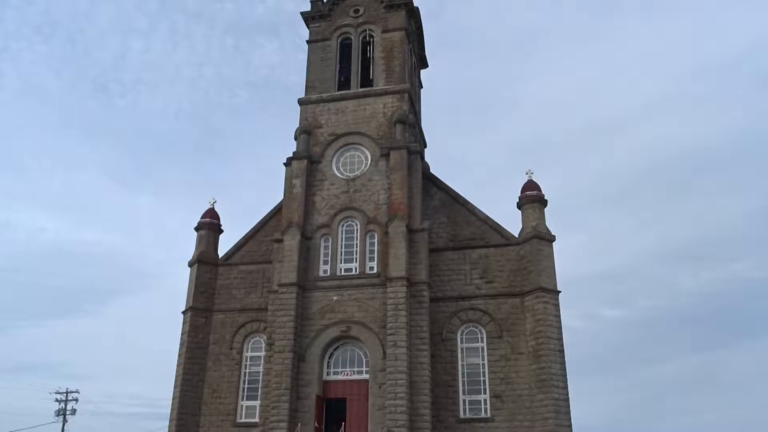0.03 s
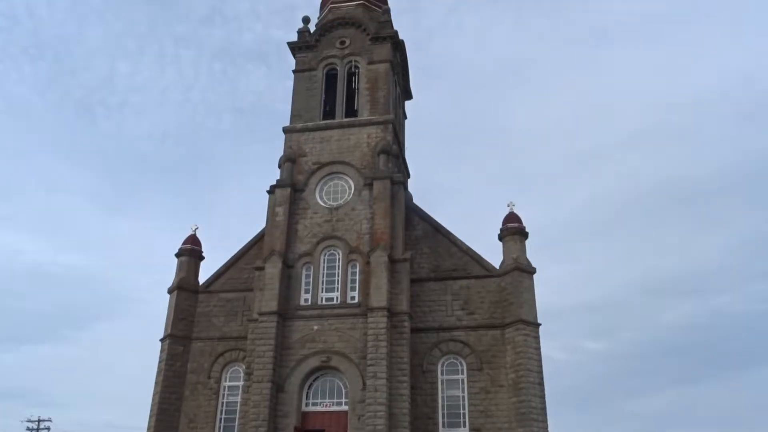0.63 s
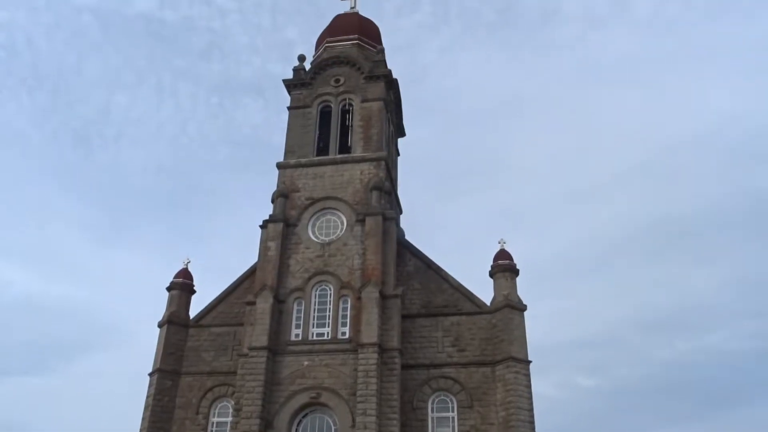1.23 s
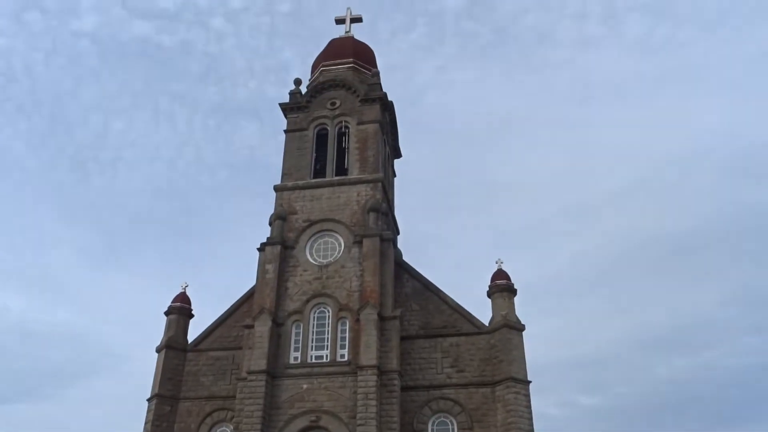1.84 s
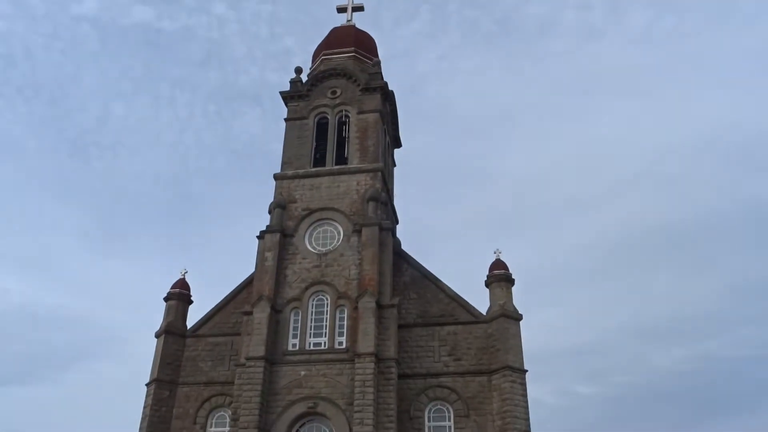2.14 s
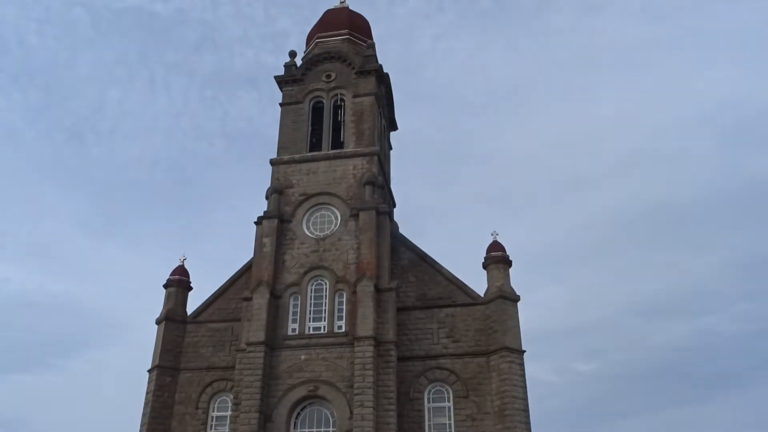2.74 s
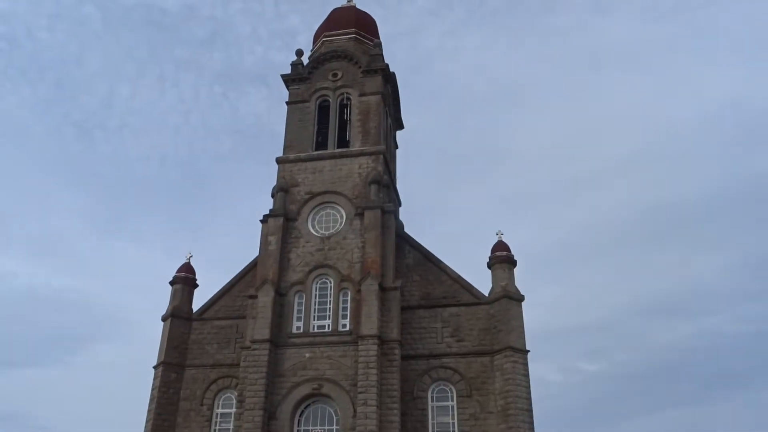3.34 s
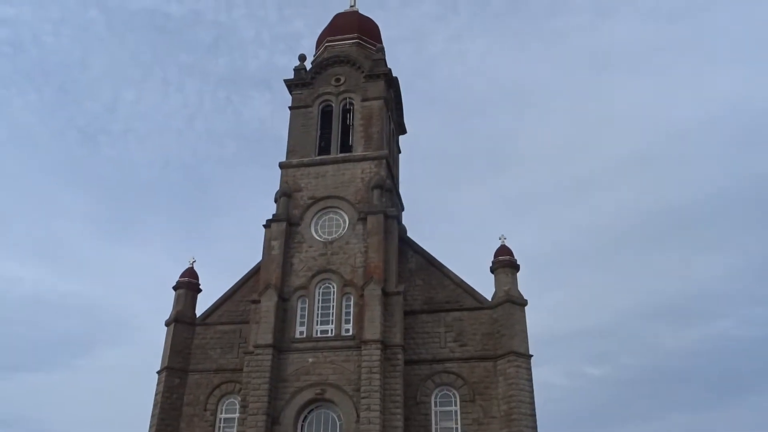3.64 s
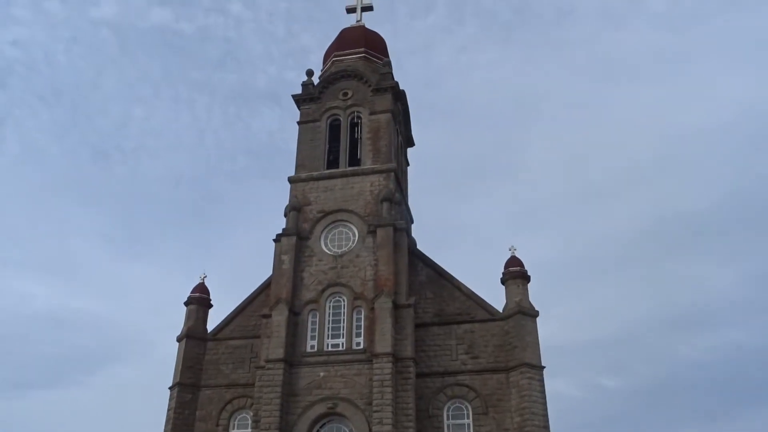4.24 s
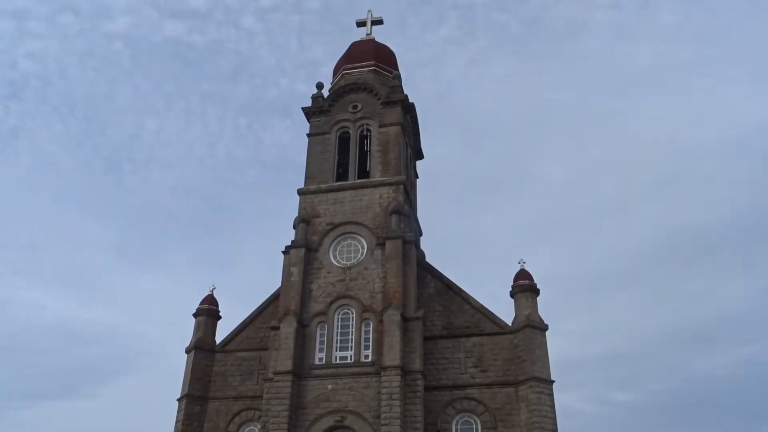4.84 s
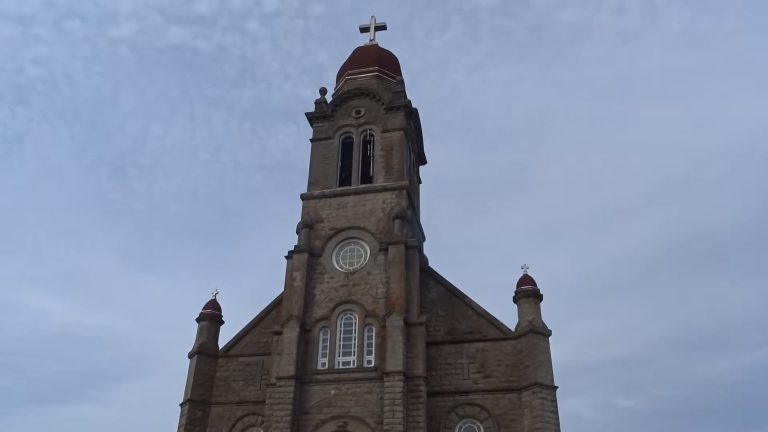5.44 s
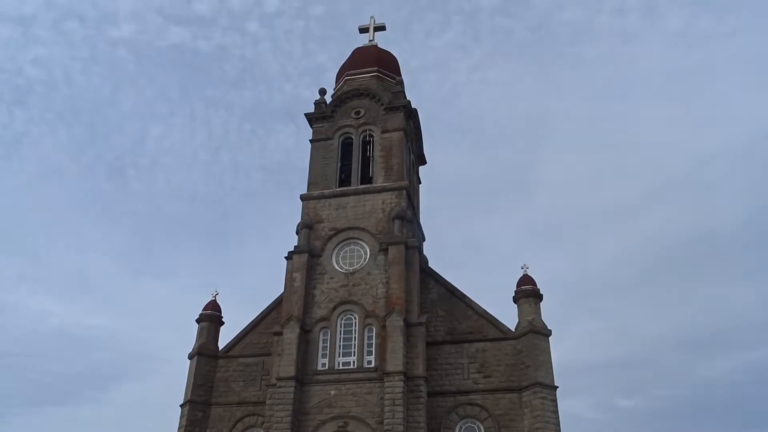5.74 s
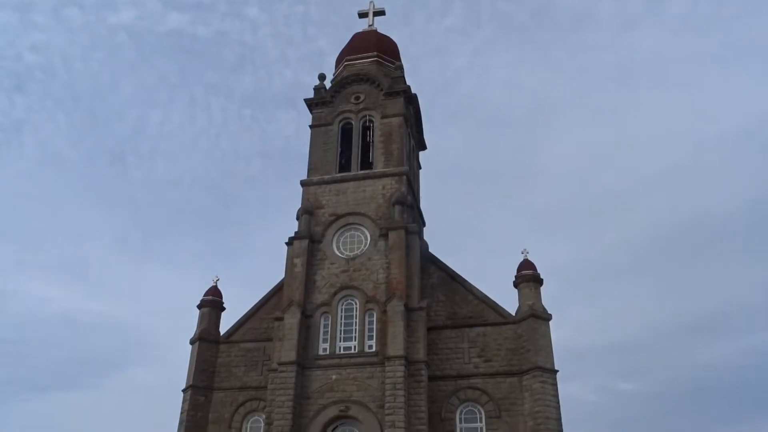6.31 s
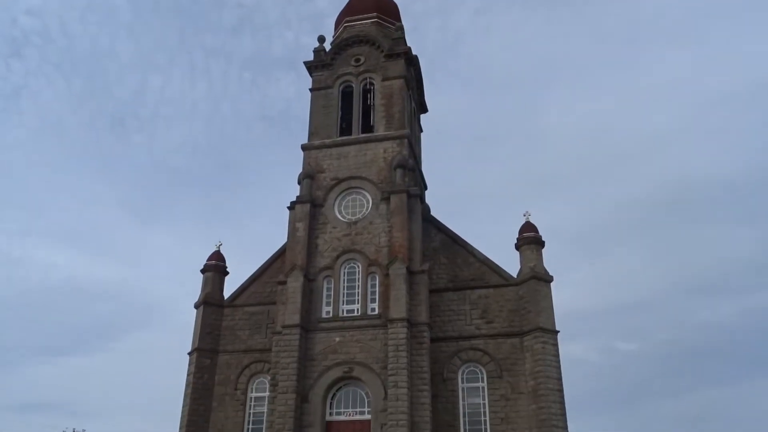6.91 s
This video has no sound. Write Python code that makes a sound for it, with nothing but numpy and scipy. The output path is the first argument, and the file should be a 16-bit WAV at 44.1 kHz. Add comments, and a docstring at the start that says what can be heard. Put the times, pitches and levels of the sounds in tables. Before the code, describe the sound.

A large church bell tolls five slow, ringing strokes outdoors while gusts of wind rumble on the microphone.

```python
"""In front of a stone church tower, a large bell swings and its clapper strikes five times, on alternate
sides. Each blow excites the bell's normal modes, which decay exponentially. With every full swing the same
lobes and gaps of the principal partials sweep past the listener; the belfry walls throw the sound back.
Turbulent wind buffets the microphone of a hand-held camera, which ticks in the hand. Small birds call
faintly over a distant rush and quiet open air."""
import sys
import numpy as np
from scipy import signal
from scipy.fft import rfft, irfft, next_fast_len
from scipy.io import wavfile
from scipy.ndimage import map_coordinates

SR = 44100
rng = np.random.default_rng(int(sys.argv[2]) if len(sys.argv) > 2 else 0)


def transcribe(u):
    """Save the signal u as a 16-bit wav file named by the first command-line argument.

    u: samples, shape (n,) or (channels, n), limited to [-1, 1]; the rate is SR.
    q: integer samples, one column per channel.
    """
    v = np.clip(np.atleast_2d(u).T, -1, 1)
    q = np.round(v * 32767).astype(np.int16)
    wavfile.write(sys.argv[1], SR, q)


N = 307377
TIME = np.arange(N) / SR
STEP = 64  # audio samples per envelope sample
SLOW = np.arange(next_fast_len(N // STEP + 300)) * STEP / SR  # envelope time [s]


def bell(flicker_db=1.08):
    """Modal superposition: the modes add, and the whole ring flickers slightly and quickly in level."""
    modes = principal_partials() + weak_partials() + shimmer()
    return tones(modes) * amp(flicker_db * wobble(22, TIME))


# Clapper blows: (time [s], level [dB], side struck [signed weight], treble tilt [dB/octave],
# clang burst boost [dB], hum boost [dB], prime boost [dB], octave boost [dB], upper fourth boost [dB])
BLOWS = [(0.029, 1.5, 0.7, -3.5, -1.5, 2.5, 4, -0.5, 3), (1.386, 2.5, -0.49, -1.5, 0, 7.5, -2, -5, 2.5),
         (2.881, 1.5, 0.79, -1.1, 0, -2, -1, 2.5, 0.5), (4.283, -1, -1.1, 1, 4, 0, 1.5, 6, 3),
         (5.752, 0, 1, 0.5, -5, 3, 0, 3.5, -3.5)]

def ringing(hz, db, t60, side_db, extra_db=0, deaden_db=0, attack_s=0.012):
    """Damped resonance: the blows' energies add in a mode; each cuts the older ring by deaden_db."""
    onset, level, side, tilt, *_ = np.transpose(BLOWS)[:, :, None]
    age = np.maximum(SLOW - onset, 0)
    later_blows = np.sum(age > 0, axis=0) - np.cumsum(age > 0, axis=0)
    blow_db = db + level + extra_db + side * side_db + tilt * max(np.log2(hz / 3000), 0)
    # the ring swells as the mouth faces the louvres, 0.52 s after a blow
    facing_db = 5 * np.exp(-((age - 0.52) / 0.35) ** 2) / (1 + (hz / 9000) ** 4)
    loss_db = deaden_db * later_blows + 60 * age / t60
    rings = amp(blow_db + facing_db - loss_db) * (1 - np.exp(-age / attack_s))
    return np.sqrt(np.sum(rings ** 2, axis=0))


# Modes that carry the note, from hum to upper sixth:
# (frequency [Hz], relative level [dB], T60 [s], gain on side +1 [dB])
PRINCIPAL_MODES = [(288, -42, 27, -0.5), (521.8, -31.5, 21.7, -0.5), (629.2, -29.5, 10.8, -1.2),
                   (1032.6, -21, 4.9, 0.5), (1533, -24.5, 6.74, 0), (2107.5, -22, 3.57, 4.5),
                   (2740, -23.5, 3.09, 1), (3418, -28.5, 3.53, -1.5)]
# Their radiation lobes (+) and gaps (-): (time into the swing [s], half width [s], gain [dB])
HUM = [(2.47, 0.35, 9)]
PRIME = [(.45, 0.12, 0.5), (0.821, 0.11, 3), (1.08, 0.084, -9.5), (2.12, .15, 1.5), (2.551, 0.16, -13.5)]
TIERCE = [(.11, 0.092, -13), (.64, 0.093, -11), (1.04, 0.25, 18), (2.11, 0.14, -7), (2.52, 0.36, 13)]
NOMINAL = [(.22, 0.055, -12), (.72, 0.21, -5), (1.281, .16, -9.5), (1.6, 0.098, 8), (1.8, 0.078, -10),
           (2.101, 0.13, 4.5), (2.619, 0.29, -10)]
TWELFTH = [(.3, 0.17, 1.5), (.7, 0.27, -2.5), (0.998, 0.07, 4.5), (1.47, 0.077, -7), (2.029, 0.088, -9.5),
           (2.79, 0.089, -11)]
OCTAVE = [(.38, 0.092, -3.5), (.58, 0.086, 2.5), (1.198, 0.026, -15.5), (1.45, 0.065, 3.5), (2.201, .31, 4)]
UPPER_FOURTH = [(.18, .05, -4.5), (.3, 0.16, 3.5), (1.4, 0.063, -4.5), (2.042, .4, 0)]
UPPER_SIXTH = [(.28, 0.11, 2.5), (1.43, .05, 7), (1.57, .06, -8.5)]

def principal_partials(drift_db=2.0):
    """Directivity: each strong mode swells and dips as its radiation pattern swings past."""
    *_, hum_db, prime_db, octave_db, fourth_db = np.transpose(BLOWS)[:, :, None]
    boosts = (hum_db, prime_db, 0, 0, 0, octave_db, fourth_db, 0)
    patterns = (HUM, PRIME, TIERCE, NOMINAL, TWELFTH, OCTAVE, UPPER_FOURTH, UPPER_SIXTH)
    modes = []
    for (hz, db, t60, side_db), lobes, boost in zip(PRINCIPAL_MODES, patterns, boosts):
        swing = amp(swinging(lobes) + drift_db * wobble(5.4, SLOW))  # no two swings are quite alike
        envelope = ringing(hz, db, t60, side_db, extra_db=boost, deaden_db=2) * swing
        # echoes disturb the low partials least
        modes.append(multipath(hz, envelope, echo_share=(hz / 5600) ** 2, jolt=0.4 * min(hz / 1500, 1)))
    return modes


def swinging(lobes):
    """Pendulum motion: the gain [dB] of the lobes and gaps repeats every full swing, or two blows."""
    first, last = BLOWS[0][0], BLOWS[-1][0]
    period = 2 * (last - first) / (len(BLOWS) - 1)
    gain_db = 0
    for centre, width, db in lobes:
        offset = (SLOW - first - centre + period / 2) % period - period / 2
        gain_db += db * np.exp(-(offset / width) ** 2)
    return gain_db


# Weaker bell modes: (frequency [Hz], relative level [dB], T60 [s], gain on side +1 [dB])
WEAK_MODES = [(1395, -36, 3, 1), (1430, -41, 6, -1), (1456, -41, 7, -1), (1818, -39, 5, -1),
              (2293, -46, 3.5, -2), (2326, -44, 2.2, 1), (2459, -44, 4, -1), (2491, -42, 8, 0),
              (2599, -45, 4, 4), (3122, -50, 2.6, 1), (3227, -53, 4, 4), (3391, -45, 3, 1),
              (3837, -52, 2.3, -2), (4119, -32, 3.3, -1), (4258, -54, 4, 1), (4842, -39, 2.8, 1),
              (5575, -39, 2, 0), (6313, -44, 2, 1), (6918, -53, 1.5, -1), (7055, -49, 1.8, 1),
              (7794, -54, 1.6, 2)]

def weak_partials(boost_db=2):
    """Inharmonic vibration: the same blows excite weaker modes among and above the principal ones."""
    modes = []
    for hz, db, t60, side_db in WEAK_MODES:
        envelope = amp(boost_db) * ringing(hz, db, t60, side_db)
        modes.append(multipath(hz, envelope, echo_share=min(hz / 5000, 0.85), jolt=0.5))
    return modes


# Strength of a single high mode: (frequency [Hz], relative level [dB])
SHIMMER_LEVELS = [(2800, -52), (3600, -59), (4400, -65), (5300, -51), (6500, -57.5), (8000, -60),
                  (9000, -64.5), (11000, -71), (12400, -93.5)]
# Decay of the high modes: (frequency [Hz], T60 [s])
SHIMMER_DECAY = [(4500, 2.4), (7000, 1.5), (11000, 1.53)]

def shimmer(count=100):
    """High modal density: a crowd of faint treble modes merges into a shimmer."""
    centres = np.linspace(SHIMMER_LEVELS[0][0], SHIMMER_LEVELS[-1][0], count)
    scatter = rng.uniform(-1, 1, (count, 3)) * [40, 7, 2.5]
    modes = []
    for centre, (detune_hz, boost_db, side_db) in zip(centres, scatter):
        hz = centre + detune_hz
        envelope = ringing(hz, along(SHIMMER_LEVELS, hz) + boost_db, along(SHIMMER_DECAY, hz), side_db)
        modes.append(multipath(hz, envelope, echo_share=0.35, jolt=0.18))
    return modes


def multipath(hz, envelope, echo_share, jolt, settle_s=0.25, width_db=-18):
    """Multipath interference: echoes modulate a mode, giving (frequency, complex stereo envelope)."""
    # echoes off the moving bell are Doppler shifted, so high partials beat faster than low ones
    beat_rate = min(1.5 + hz / 170, 22)
    share = np.clip(echo_share, 0, 1)
    paths = np.sqrt(1 - share) + np.sqrt(share) * fading(beat_rate)
    # newly arriving echoes jolt the gain and phase, most of all just after a blow
    fresh = sum((SLOW > onset) * np.exp(-np.abs(SLOW - onset) / settle_s) for onset, *_ in BLOWS)
    tremble = (fresh + 0.52) * fading(36)
    rattle = 0.69 * (fresh + 0.29) * fading(120)
    paths = unit(paths + jolt * (tremble + rattle))
    # the direction of arrival wanders, and with it the phase between the microphone ports
    side = 1j * amp(width_db) * wobble(5, SLOW)
    return hz, envelope * paths * np.array([1 + side, 1 - side])


# Impact noise of the clapper: (frequency [Hz], relative spectral level [dB])
CLANG_SPECTRUM = [(300, -30), (750, -8), (1100, 0), (1500, 0), (2500, -3), (3600, -9), (5500, -15),
                  (8000, -26), (11000, -35), (13000, -58)]
# Reverberation time of the belfry: (frequency [Hz], T60 [s])
BELFRY_DECAY = [(500, 2.6), (2000, 2.4), (4000, 2.0), (7000, 1.5), (11000, 1.2)]

def clang(burst_db=-30, burst_s=0.042, tail_db=-39, build_s=0.007):
    """Reverberation: each impact gives a clump of early echoes, then a tail whose treble dies first."""
    hz, t, spectra = signal.stft(noise(CLANG_SPECTRUM, side_db=-27), SR, nperseg=256)
    t60 = along(BELFRY_DECAY, hz)[:, None]
    power = np.zeros(spectra.shape[1:])
    for onset, db, _, tilt, boost_db, *_ in BLOWS:
        age = np.maximum(t - onset, 0)
        burst = amp(burst_db + boost_db) * age / burst_s * np.exp(1 - age / burst_s)
        tail = amp(tail_db - 60 * age / t60) * (1 - np.exp(-age / build_s))
        colour = amp(db + tilt * np.log2(np.maximum(hz / 3000, 1)))
        power += colour[:, None] ** 2 * (burst ** 2 + tail ** 2)
    return signal.istft(spectra * np.sqrt(power), SR, nperseg=256)[1][:, :N]


# Wind strength at the microphone: (time [s], level [dB])
GUSTS = [(0.2, -32.5), (0.69, -21.5), (1.07, -27.5), (1.22, -23.5), (1.24, -17), (1.35, -23), (1.99, -25.5),
         (2.05, -30.5), (2.69, -19), (2.97, -25.5), (3.29, -27.5), (3.38, -21), (3.5, -29), (3.52, -22),
         (3.67, -25), (3.69, -25), (4.08, -20), (4.76, -27), (4.84, -22), (5.06, -18.5), (5.22, -27),
         (5.27, -22), (5.76, -19), (5.84, -25.5), (6.12, -22), (6.63, -29), (6.69, -22), (6.97, -23.5)]
# Low rumble and brighter flutter of the eddies: (frequency [Hz], relative spectral level [dB])
RUMBLE_SPECTRUM = [(12, -46.5), (25, -11.5), (50, -3), (90, 1.5), (150, 0.5), (230, -8), (400, -27),
                   (900, -83)]
FLUTTER_SPECTRUM = [(60, -20), (140, -1), (220, 0), (380, -7), (550, -14), (800, -20), (1300, -30),
                    (2500, -47), (4500, -70), (9000, -95)]

def wind(flutter_offset_db=-4.5, flutter_growth=1.73, lead_s=0.00054):
    """Turbulent pressure: eddies cross the microphone ports from the left; strong gusts are brighter."""
    strength_db = np.interp(TIME, *np.transpose(GUSTS))
    mean_db = strength_db.mean()
    gust_db = strength_db - mean_db + 2 * np.tanh(wobble(14, TIME))
    flutter_db = mean_db + flutter_growth * gust_db + flutter_offset_db + 3 * np.tanh(wobble(18, TIME))
    eddies_db = 2.3 * wobble(38, TIME)
    rumble = amp(mean_db + gust_db) * unit(noise(RUMBLE_SPECTRUM, side_db=-17) * amp(eddies_db / 2))
    flutter = amp(flutter_db) * unit(noise(FLUTTER_SPECTRUM, side_db=-10) * amp(eddies_db))
    ports = np.array([[1], [-1]])  # left leads right at low frequencies
    return filtered(rumble + flutter,
                    lambda hz: np.exp(1j * np.pi * hz * lead_s / (1 + (hz / 900) ** 2) * ports))


# Bird calls: (time [s], duration [s], start pitch [Hz], end pitch [Hz], relative level [dB], buzz [Hz])
CALLS = [(1.0, 0.15, 6400, 5600, -70, 253), (1.23, 0.22, 7850, 7700, -78, 40),
         (2.03, .22, 7600, 5540, -60.5, 380), (1.992, .26, 10400, 10300, -72, 453),
         (4.097, 0.16, 6100, 6150, -94, 80), (5.44, .15, 6160, 6100, -94, 70),
         (5.64, 0.082, 6050, 6260, -83, 70)]

def birds(boost_db=7.0):
    """Frequency modulation: thin whistles glide, and fast random swings of pitch make some buzz."""
    out = np.zeros(N)
    for onset, length, start_hz, end_hz, db, buzz_hz in CALLS:
        t = np.arange(int(length * SR)) / SR
        glide = start_hz + (end_hz - start_hz) * t / length
        pitch = glide + buzz_hz * wobble(900, t) + 60 * wobble(30, t)
        envelope = amp(db + boost_db) * np.sin(np.pi * t / length)
        out[round(onset * SR):][:len(t)] += envelope * np.sin(2 * np.pi * np.cumsum(pitch) / SR)
    return out


# Handling ticks beside the microphone: (time [s], level [dB])
HANDLING_TICKS = [(0.68, -60), (0.731, -61.5), (0.8717, -58), (5.4216, -41)]
# Colour of a tick: (frequency [Hz], relative spectral level [dB])
TICK_SPECTRUM = [(1500, -16.5), (3500, 4.5), (10000, -4.5), (15500, -15.5)]

def ticks(t60=0.011):
    """Heavily damped transients: the camera gives tiny dry ticks in the hand."""
    envelope = sum((TIME > onset) * amp(db - 60 * np.abs(TIME - onset) / t60)
                   for onset, db in HANDLING_TICKS)
    return envelope * noise(TICK_SPECTRUM, side_db=-4.5)


# Far-off rushing sound: (frequency [Hz], relative spectral level [dB])
RUSH_SPECTRUM = [(200, -13.5), (550, -3), (900, -1), (1300, -5.5), (2000, -12.5), (4000, -35.5),
                 (8000, -60)]

def distant_rush(start_db=-48.5, db_per_s=1.19):
    """Band-limited noise: a midrange rush grows slowly louder."""
    return amp(start_db + db_per_s * TIME) * noise(RUSH_SPECTRUM, side_db=-10)


# Quiet outdoor background: (frequency [Hz], relative spectral level [dB])
AIR_SPECTRUM = [(100, 0), (1000, -4), (3000, -17), (6000, -29), (10000, -38), (15500, -45)]

def open_air(level_db=-52):
    """Ambient noise floor: a steady hush that falls away toward the treble."""
    return amp(level_db) * noise(AIR_SPECTRUM, side_db=-12)


def amp(db):
    """Decibels to amplitude ratio."""
    return 10 ** (np.asarray(db) / 20)


def unit(x):
    """Normalisation to rms 1."""
    return x / np.sqrt(np.mean(np.abs(x) ** 2) + 1e-20)


def along(points, hz):
    """Interpolation of (frequency [Hz], value) points on a logarithmic frequency axis."""
    frequencies, values = np.transpose(points)
    return np.interp(np.log(hz + 1), np.log(frequencies + 1), values)


def wobble(rate, t):
    """Smooth random modulation with `rate` knots a second."""
    return map_coordinates(rng.standard_normal(4096), [t * rate], mode="grid-wrap")


def fading(rate):
    """Rayleigh fading: the summed gain and phase of many shifting echoes, at rms 1."""
    return unit(wobble(rate, SLOW) + 1j * wobble(rate, SLOW))


def filtered(x, response):
    """Linear filtering: the spectrum of x times a frequency response."""
    size = next_fast_len(N + SR // 2)
    return irfft(rfft(x, size) * response(np.fft.rfftfreq(size, 1 / SR)), size)[..., :N]


def noise(spectrum, side_db):
    """Mid-side stereo noise of rms 1 with the given colour and width."""
    mid, side = filtered(rng.standard_normal((2, N)), lambda hz: amp(along(spectrum, hz)))
    return unit(np.array([mid + amp(side_db) * side, mid - amp(side_db) * side]))


def tones(modes):
    """Frequency shifting: each slow envelope is moved up to its mode's frequency, and all are summed."""
    size = len(SLOW) * STEP
    bins = np.rint(np.fft.fftfreq(len(SLOW)) * len(SLOW)).astype(int)
    spectrum = np.zeros((2, size), complex)
    for hz, envelope in modes:
        spectrum[:, bins + round(hz * size / SR)] += np.fft.fft(envelope) * STEP
    return np.fft.ifft(spectrum).real[:, :N]


def scene():
    """Superposition: the pressures of all the sources add at the microphone."""
    background = open_air() + distant_rush()
    return bell() + clang() + wind() + birds() + ticks() + background


def record(dry, start_s=0.078, fade_s=0.14, top_hz=15800):
    """Band limiting: the camera fades its sound in and passes nothing above top_hz."""
    fade_in = np.clip((TIME - start_s) / fade_s, 0, 1)
    return filtered(dry * fade_in, lambda hz: hz < top_hz)


dry = scene()
out = record(dry)
transcribe(out)
```